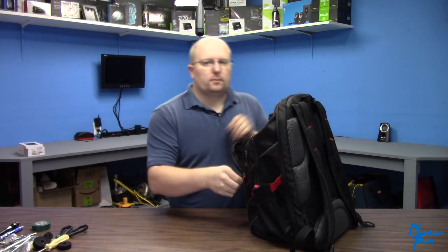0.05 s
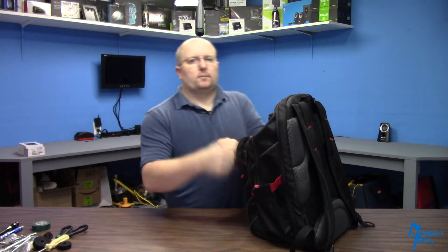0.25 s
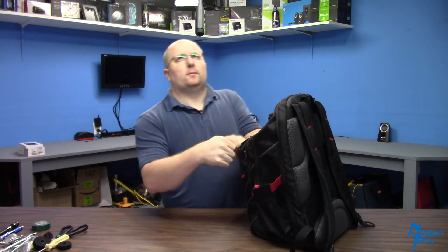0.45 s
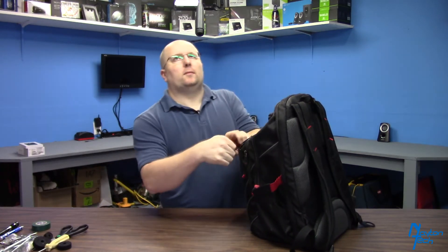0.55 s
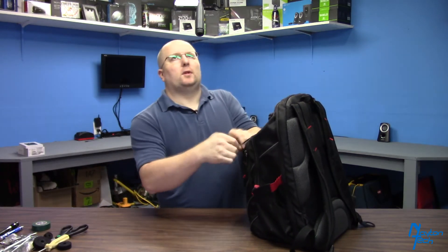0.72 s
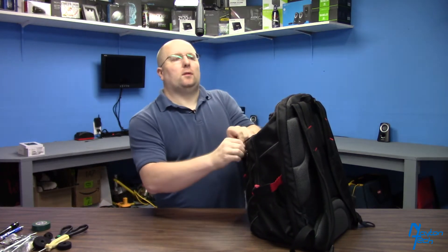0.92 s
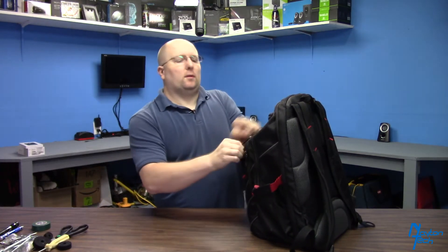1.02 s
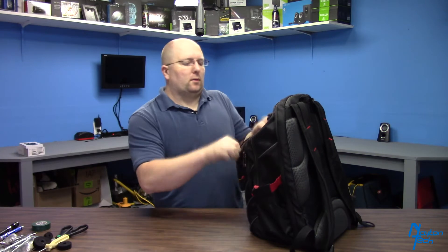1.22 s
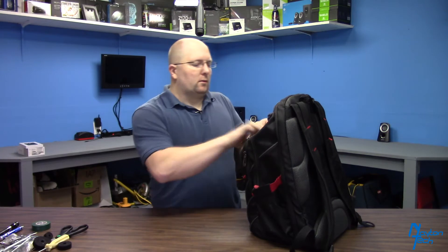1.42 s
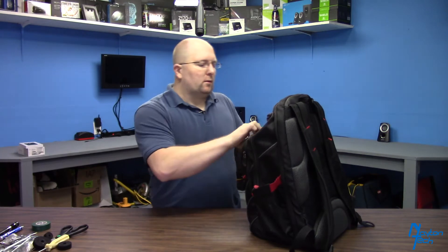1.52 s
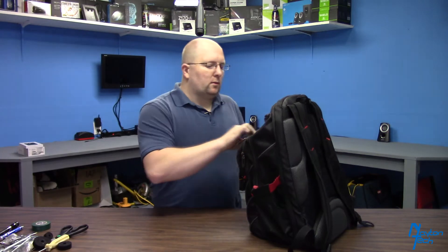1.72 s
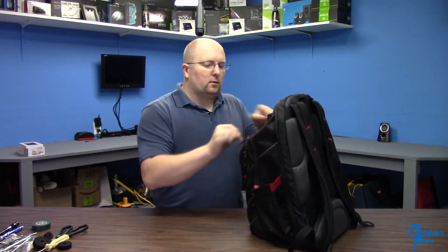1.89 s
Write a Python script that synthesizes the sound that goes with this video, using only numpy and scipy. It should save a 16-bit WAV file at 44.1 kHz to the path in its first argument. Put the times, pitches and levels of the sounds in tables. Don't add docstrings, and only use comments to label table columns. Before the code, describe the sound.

A backpack zipper gives one quick zip, pauses, then two joined strokes and a last short one, with nylon rustling, soft finger knocks and metal tab ticks between, close in a small room.

```python
import sys
import numpy as np
from scipy import signal
from scipy.fft import rfft, irfft, next_fast_len
from scipy.io import wavfile

SR = 44100
rng = np.random.default_rng(int(sys.argv[2]) if len(sys.argv) > 2 else 0)


def volts_from_decibels(level):
    exponent = np.asarray(level, float) / 20
    return 10 ** exponent


def wav_record(signal):
    frames = np.transpose(np.atleast_2d(signal))
    bounded = np.clip(frames, -1, 1)
    quanta = np.round(bounded * 32767).astype(np.int16)
    wavfile.write(sys.argv[1], SR, quanta)


N = 85995


def rms_one(x):
    return x / np.sqrt(np.mean(x ** 2) + 1e-20)


def in_time(rows):
    s, *columns = np.transpose(rows)
    return [np.interp(np.arange(N) / SR, s, column) for column in columns]


def at_hz(points, hz):
    point_hz, db = np.transpose(points)
    return np.interp(np.log(hz), np.log(point_hz), db)


def drift(rate):
    r = np.exp(-16 * np.pi * rate / SR)
    noise = rng.standard_normal(N // 8 + 3002)
    slow = rms_one(signal.lfilter([1], [1, -2 * r, r * r], noise)[3000:])
    return np.interp(np.arange(N) / 8, np.arange(len(slow)), slow)


def band_filter(x, order, cutoff_hz, kind):
    return signal.sosfilt(signal.butter(order, cutoff_hz, kind, fs=SR, output="sos"), x)


def ring(clicks, hz, t60):
    r, w = volts_from_decibels(-60 / (t60 * SR)), 2 * np.pi * hz / SR
    return signal.lfilter([0, np.sin(w)], [1, -2 * r * np.cos(w), r * r], clicks)


def grains(rate, spread_db):
    sizes = volts_from_decibels(spread_db * np.minimum(rng.exponential(1, N), 5)) * rng.standard_normal(N)
    return sizes * (rng.random(N) < rate / SR) + 1e-9


def colour(x, spectrum, patchy_db):
    size = next_fast_len(N)
    hz = np.maximum(np.arange(size // 2 + 1) * SR / size, 1)
    shaped = rfft(x, size) * volts_from_decibels(at_hz(spectrum, hz)) * (hz > spectrum[0][0])
    place = 2 * np.log2(hz)
    lowest, highest = int(2 * np.log2(spectrum[0][0])), int(2 * np.log2(spectrum[-1][0])) + 2
    out = 0
    for k in range(lowest, highest + 1):
        band = irfft(shaped * np.clip(1 - abs(place - k), 0, 1), size)[:N]
        out = out + volts_from_decibels(patchy_db * drift(19.2)) * band
    return rms_one(out)


# (f/Hz, level/dB per Hz)
ROOM_TONE = [(12, -22), (20, 4.5), (107, 6), (780, -7.5), (976, -11), (2320, -17), (6010, -31),
             (12100, -34), (16000, -39)]


def background():
    floor = colour(rng.standard_normal(N), ROOM_TONE, patchy_db=1.8)
    rumble = band_filter(rng.standard_normal(N + SR), 2, [18, 43], "band")[SR:]
    return volts_from_decibels(-45) * floor + volts_from_decibels(-45) * rms_one(rumble)


def earlier_stroke():
    centre_hz, width_hz, level_db, t60_s = 576, 99, -34.5, 0.35
    tone = rms_one(ring(rng.standard_normal(N), centre_hz, 3.9 / width_hz))
    return volts_from_decibels(level_db - 60 * np.arange(N) / SR / t60_s) * tone


# (t/s, rustle level/dB, body level/dB)
HANDLING_MOVES = [(0, -45.5, -45.5), (.17, -52.5, -59), (.36, -44, -39), (.45, -39.5, -43.5),
                  (.55, -43, -54), (.59, -52, -50), (.625, -44, -44), (.645, -49.5, -48), (.69, -54.5, -74),
                  (.86, -51.5, -48), (.9, -45, -51), (.94, -49, -40), (1.26, -35, -34.5), (1.3, -49.5, -39),
                  (1.425, -57, -73), (1.436, -45, -42), (1.46, -42.5, -35.5), (1.5, -36, -54),
                  (1.64, -41.5, -35), (1.668, -49.5, -40), (1.7, -40, -39), (1.757, -48.5, -43.5),
                  (1.8, -48.5, -32.5), (1.86, -56, -43), (1.875, -62, -45)]
# (f/Hz, level/dB per Hz)
NYLON = [(880, -29), (1500, 9), (2800, 5.5), (5890, 7), (10200, -2), (12100, 3.5), (15500, -6)]
# (f/Hz, level/dB per Hz)
BAG_BODY = [(59, 11), (100, 11), (546, 3.5), (695, 6), (1130, 9.5), (2500, -14.5), (3250, -11),
            (5500, -120)]


def cloth():
    rustle_db, body_db = in_time(HANDLING_MOVES)
    rustle_rate = 14000 * volts_from_decibels(1.2 * drift(23))
    creak_rate = 1800 * volts_from_decibels(3 * drift(14))
    rustle = colour(grains(rustle_rate, 0.84), NYLON, patchy_db=2.2)
    body = colour(grains(creak_rate, 1.25), BAG_BODY, patchy_db=2.0)
    return volts_from_decibels(rustle_db) * rustle + volts_from_decibels(body_db) * body


def hits(rows, cycles, snap_db, snap_s, spread):
    out, n = np.zeros(N + SR), np.arange(SR // 20)
    click = (n == 0) * 1.
    for s, db, hz in rows:
        below, above = rng.uniform(0.7, 1.135, 2)
        band_hz = np.clip([hz / spread ** 2, hz * spread ** 1.47], 100, 17000)
        modes_hz = (hz, hz * below / spread, hz * above * np.sqrt(spread))
        tone = sum(ring(click, min(f, 15000), cycles / hz) for f in modes_hz)
        snap = rms_one(band_filter(rng.standard_normal(len(n)), 2, band_hz, "band"))
        hit = band_filter(tone, 2, band_hz, "band") + volts_from_decibels(snap_db) * snap * np.exp(-n / SR / snap_s)
        start = int(s * SR)
        out[start:start + len(n)] += volts_from_decibels(db) * hit / np.abs(hit).max()
    return out[:N]


# (t/s, peak level/dB, f/Hz)
TAB_TICKS = [(0.025, -25, 6750), (0.0865, -23, 6700), (0.1297, -23, 5270), (0.192, -20, 5530),
             (0.5247, -20, 5400), (0.6565, -13, 5120), (0.6568, -20, 11000), (0.6677, -25, 7060),
             (1.027, -15, 4040), (1.0775, -16, 4700), (1.195, -20, 12000), (1.2567, -17, 6500),
             (1.275, -15.5, 6550), (1.443, -25, 3070), (1.4685, -14, 6100), (1.4975, -16, 5810),
             (1.798, -29, 12500), (1.8065, -23, 13500), (1.8178, -3, 11500), (1.8203, -11, 11000),
             (1.8245, -24, 11000), (1.8336, -16, 6600)]


def ticks():
    return volts_from_decibels(-6) * hits(TAB_TICKS, cycles=30, snap_db=3, snap_s=0.0012, spread=1.28)


# (t/s, peak level/dB, f/Hz)
BAG_KNOCKS = [(0.129, -32.5, 1360), (0.184, -46, 1160), (0.641, -27, 925), (0.782, -35.5, 590),
              (0.81, -34.5, 640), (0.84, -23.5, 845), (0.84, -28, 1200), (0.896, -32, 990),
              (1.254, -30, 910), (1.272, -23, 474), (1.356, -38, 966), (1.387, -32.5, 495),
              (1.435, -30.5, 503), (1.4345, -25.5, 1200), (1.443, -25, 282), (1.444, -28.5, 1430),
              (1.465, -26, 420), (1.466, -26, 1480), (1.478, -23, 497), (1.479, -44, 1600),
              (1.492, -35, 1420), (1.491, -18, 465), (1.618, -16, 444), (1.624, -19, 980),
              (1.782, -29, 1270), (1.806, -36, 2240), (1.818, -28, 540), (1.837, -29, 1134),
              (1.849, -28, 290)]


def knocks():
    return volts_from_decibels(3) * hits(BAG_KNOCKS, cycles=15, snap_db=-17.5, snap_s=0.005, spread=1.9)


# (t/s, tooth pair rate f/Hz, partials 1, 2 and 3 level/dB, rasp level/dB)
FIRST_PULL = [
    (0.185, 229.3, -67, -57, -66, -43),
    (0.208, 293.8, -30.5, -31, -32, -33.5),
    (0.225, 491.1, -28.5, -12.5, -21, -32),
    (0.238, 541.6, -25.5, -17.5, -29, -32.5),
    (0.25, 580.8, -26, -14, -34, -31.5),
    (0.264, 474.4, -35, -21.5, -22, -35),
    (0.272, 374.5, -23.5, -25, -34, -35),
    (0.276, 357.4, -23, -49, -32.5, -35),
    (0.34, 126.3, -30.5, -36, -44, -51),
]
SECOND_PULL = [
    (0.974, 230.6, -34, -34, -50, -46),
    (0.999, 345.6, -22, -20, -36, -37.5),
    (1.02, 420, -19, -23, -32, -33),
    (1.048, 410.2, -20, -21.5, -38, -36),
    (1.054, 400.6, -22.5, -27.5, -22, -38),
    (1.071, 373, -22, -28, -20, -34),
    (1.11, 451.5, -39, -37, -29.5, -35),
]
THIRD_PULL = [
    (1.112, 400, -44, -49, -41, -35.5),
    (1.132, 529, -20, -27, -32, -29.5),
    (1.156, 644.5, -24, -18, -50, -31),
    (1.182, 487.5, -18, -30, -37, -34.5),
    (1.202, 442.5, -29.5, -21, -49, -38),
    (1.238, 220, -28.5, -62, -50, -55),
]
FOURTH_PULL = [
    (1.492, 139.3, -37, -16, -32, -40.5),
    (1.51, 322.9, -32, -27.5, -50, -45),
    (1.528, 460.4, -29, -23.5, -39, -37),
    (1.56, 569.6, -20.5, -37, -34, -28.5),
    (1.57, 533.3, -17.5, -37, -30, -34.5),
    (1.586, 594.8, -17.5, -26, -36, -31.5),
    (1.605, 543, -26.5, -24, -36, -31.5),
    (1.622, 274.5, -16, -20.5, -24.5, -36.5),
    (1.636, 210, -34, -37, -35, -59),
]
PULL_TILT = (-4, 3, -1.5, 9)
PULL_UPPER = (-1, 3, 1.5, 6)
# (f/Hz, level/dB)
BAG_PANEL = [(700, 5), (1100, 7.5), (1600, 0.5), (2300, -3.5), (4000, -14.5), (6500, -47)]
# (f/Hz, level/dB per Hz)
SLIDER_RASP = [(1060, -58), (1800, 1.5), (3180, -1.5), (4980, 2.5), (8180, -5.5), (10500, -6.5),
               (13000, -6.5), (15500, -22)]
# (f/Hz, level/dB per Hz)
SLIDER_DRAG = [(55, 2), (120, -2), (250, 3.5), (600, 1), (1100, -4), (1600, -2), (2500, -18.5)]


def zipper():
    t, out = np.arange(N) / SR, np.zeros(N)
    wobble_depth, steady_hz, fade_s = 0.016, 500, 0.0079
    rasp = colour(grains(16000, 1.5), SLIDER_RASP, patchy_db=2.0)
    sheen = band_filter(rasp, 2, 8000, "high")
    drag = colour(grains(4000, 2.0), SLIDER_DRAG, patchy_db=1.5)
    clumps = volts_from_decibels(1.5 * drift(150))
    wobble = drift(130)
    flutter = [drift(80) for k in range(10)]
    pulls = (FIRST_PULL, SECOND_PULL, THIRD_PULL, FOURTH_PULL)
    for pull, tilt_db, upper_db in zip(pulls, PULL_TILT, PULL_UPPER):
        hz, first_db, second_db, third_db, rasp_db = in_time(pull)
        unsteady = wobble_depth * (steady_hz / hz) ** 2 * np.tanh(hz / 250)
        phase = 2 * np.pi * np.cumsum(hz * (1 + unsteady * wobble)) / SR
        song = 0
        for k in range(1, 11):
            if k <= 3:
                level_db = (first_db, second_db, third_db)[k - 1]
            else:
                level_db = rasp_db + upper_db - 8 + at_hz(BAG_PANEL, k * hz)
            flutter_db = min(0.8 * k, 2.0) * steady_hz / hz * flutter[k - 1]
            song = song + volts_from_decibels(level_db + flutter_db) * np.sqrt(2) * np.sin(k * phase + k * k / 2)
        tooth_gate = (1 + 0.6 * np.cos(phase)) * clumps
        tilted_rasp = rasp + (volts_from_decibels(tilt_db) - 1) * sheen
        noise = volts_from_decibels(rasp_db) * (volts_from_decibels(-3) * tooth_gate * tilted_rasp + volts_from_decibels(3.5) * drag)
        to_edge_s = np.minimum(t - pull[0][0], pull[-1][0] - t)
        out += np.clip(to_edge_s / fade_s + 0.5, 0, 1) * (song + noise)
    return out + volts_from_decibels(-47) * ring(out, 1100, t60=0.13)


def room(x):
    t60_s, wall_cut_hz, gap_s = 0.37, 6700, 0.0082
    t = np.arange(SR // 2) / SR
    low, high = rng.standard_normal((2, len(t)))
    low = rms_one(band_filter(low, 1, wall_cut_hz, "low"))
    tail = low * volts_from_decibels(-60 * t / t60_s) + 0.53 * high * volts_from_decibels(-120 * t / t60_s)
    tail = tail * np.clip(t / gap_s - 1, 0, 1)
    return signal.fftconvolve(x, tail / np.sqrt(np.sum(tail ** 2)))[:N]


def scene():
    near = ticks() + knocks() + zipper()
    mix = near + volts_from_decibels(-17.5) * room(near) + cloth() + background() + earlier_stroke()
    return mix[None]


def band_limit(x):
    return signal.sosfilt(signal.butter(12, 16990, fs=SR, output="sos"), x)


def record(dry):
    top_cut = signal.ellip(10, 0.5, 60, 15750, fs=SR, output="sos")
    mix = signal.sosfilt(top_cut, dry)
    return band_limit(mix)


dry = scene()
out = record(dry)
wav_record(out)
```